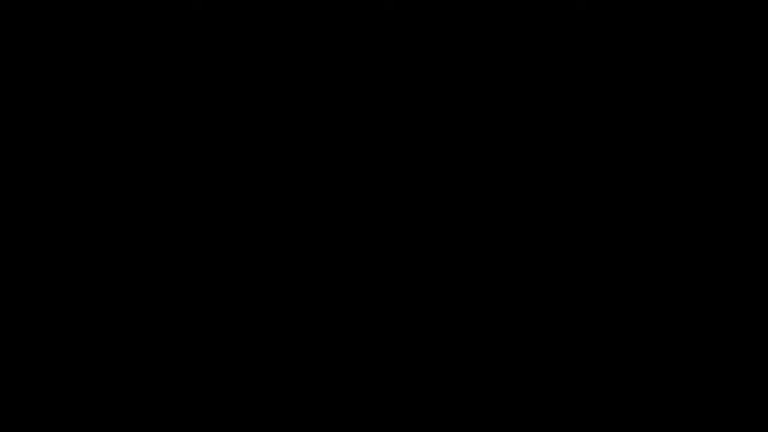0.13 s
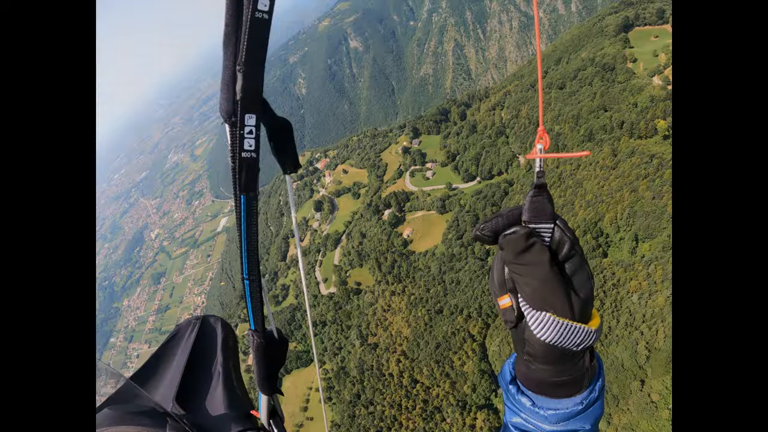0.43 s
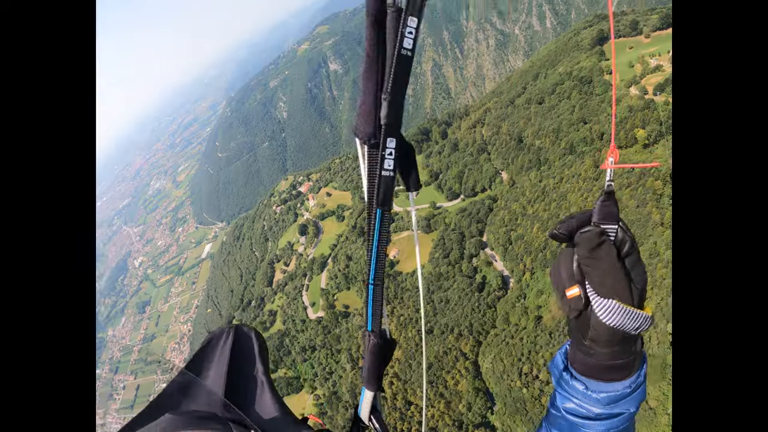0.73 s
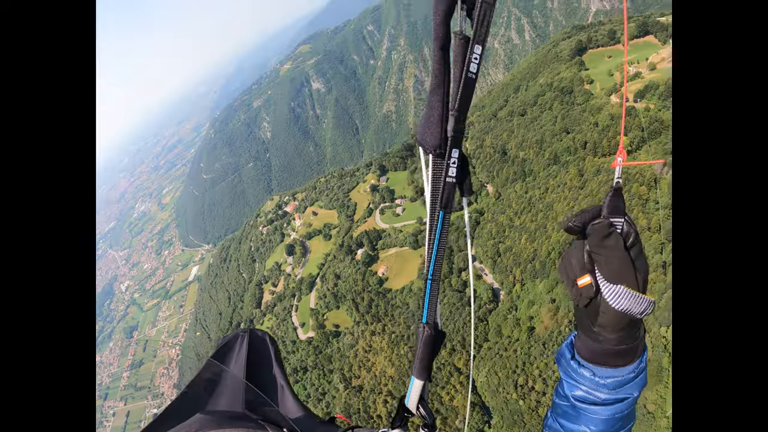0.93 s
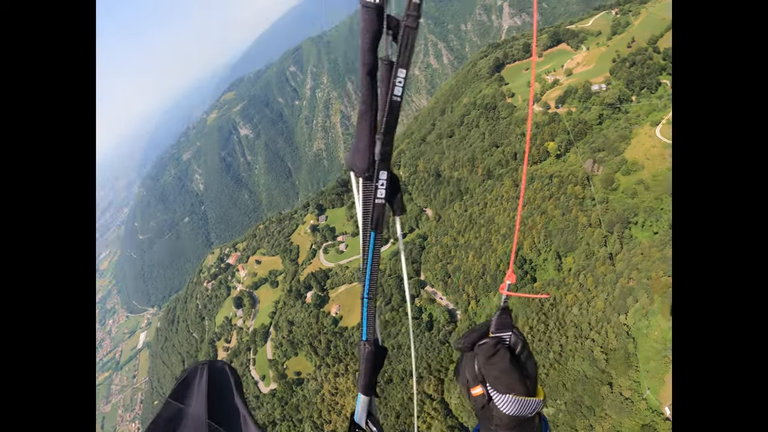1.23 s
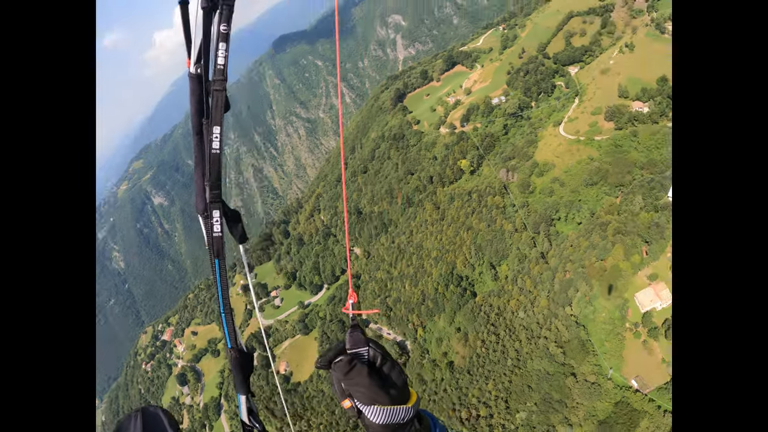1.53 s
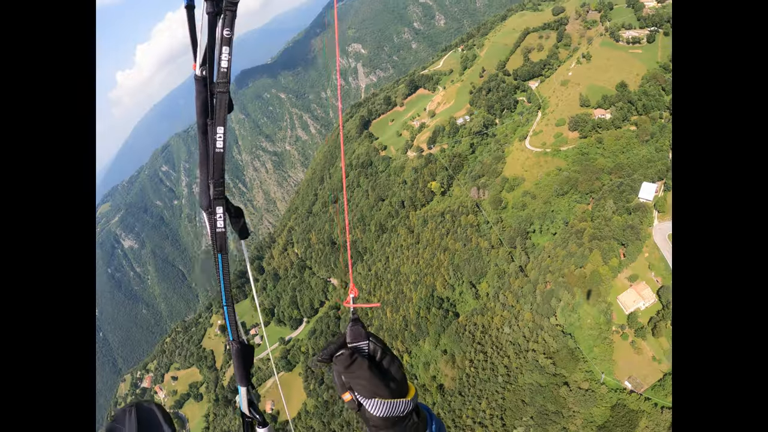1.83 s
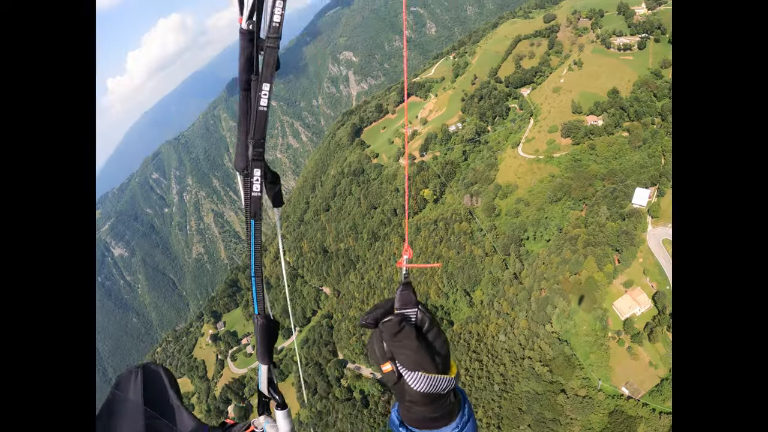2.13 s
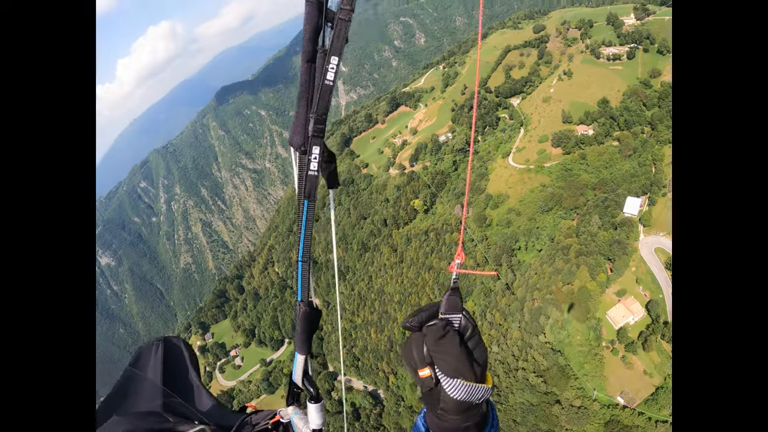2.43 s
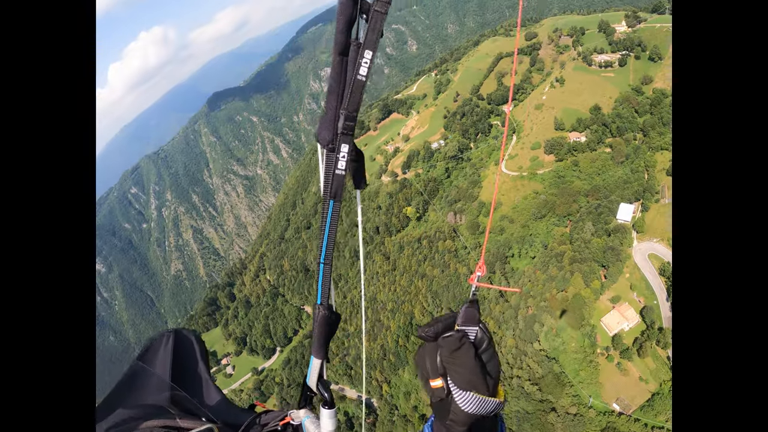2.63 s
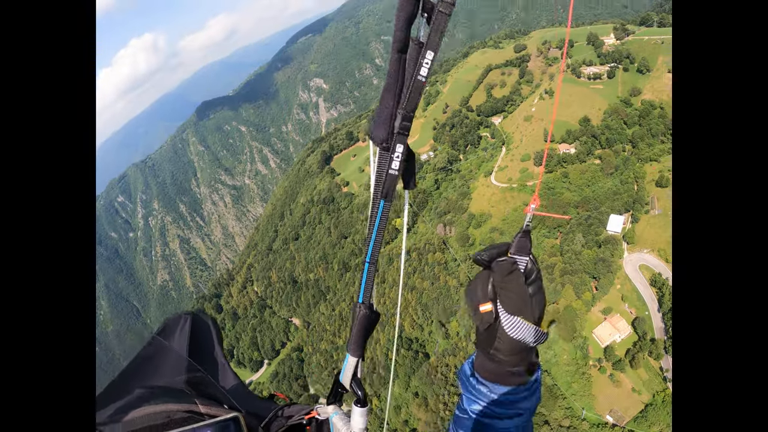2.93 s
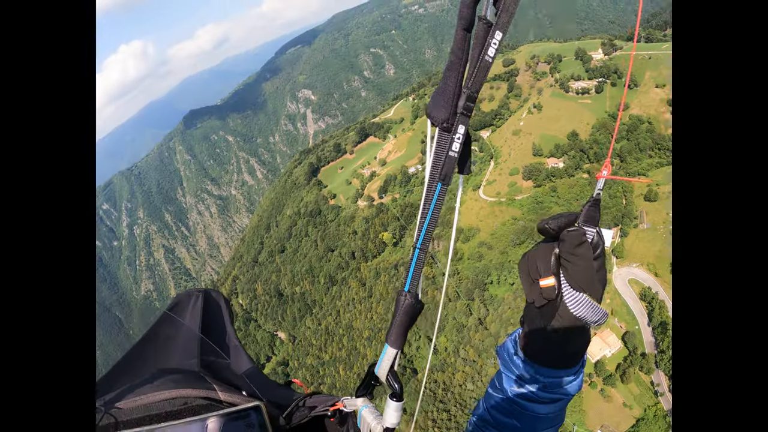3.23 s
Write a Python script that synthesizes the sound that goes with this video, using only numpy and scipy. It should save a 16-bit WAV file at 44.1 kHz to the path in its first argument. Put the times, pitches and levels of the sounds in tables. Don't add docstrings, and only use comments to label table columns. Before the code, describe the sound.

Wind on a paraglider's exposed camera microphone starts abruptly after a tiny silence: deep rumble, soft airy hiss and lumpy turbulence. A pop lands at 0.6 s, a barely audible webbing squeak at 0.8. From 1.1 to 1.9 s, hard thumps, flutter and fizz crowd together, the level ducking after loud hits. Sparse pops follow over calmer rumble; heavy gusts return at 2.9-3.2 s, then subside.

```python
import sys
import numpy as np
from scipy import signal
from scipy.fft import rfft, irfft, next_fast_len
from scipy.io import wavfile
from scipy.ndimage import uniform_filter1d, map_coordinates

SR = 44100
rng = np.random.default_rng(int(sys.argv[2]) if len(sys.argv) > 2 else 0)


def store_pcm(level_fs):
    pcm = np.round(np.clip(level_fs, -1, 1) * 32767).astype(np.int16)
    wavfile.write(sys.argv[1], SR, np.atleast_2d(pcm).T)


def volts(x):
    e = np.asarray(x, float) / 20
    return 10 ** e


N = 148617


def unit(x):
    return x / np.sqrt(np.mean(x ** 2) + 1e-20)


def curves(rows):
    s, *cols = np.transpose(rows)
    return [np.interp(np.arange(N) / SR, s, c) for c in cols]


def wobble(rate_hz):
    knots = rng.standard_normal(int(N * 400 / SR) + 4)
    return map_coordinates(knots, [np.arange(N) * min(rate_hz, 400) / SR])


def rush(spectrum, patchy_db, source=1):
    z = signal.stft(source * rng.standard_normal(N), nperseg=512)[2]
    field = uniform_filter1d(rng.standard_normal(z.shape), size=8, axis=0)
    field = uniform_filter1d(field, size=8, axis=1)
    x = signal.istft(z * volts(patchy_db * unit(field)), nperseg=512)[1][:N]
    m = next_fast_len(N + 8192)
    hz, db = np.transpose(spectrum)
    log_hz = np.log(np.fft.rfftfreq(m, 1 / SR) + 1)
    colour = volts(np.interp(log_hz, np.log(hz + 1), db, right=-180))
    return unit(irfft(rfft(x, m) * colour, m)[:N])


def steady(x, window_s):
    power = np.abs(uniform_filter1d(x ** 2, round(window_s * SR)))
    return unit(x / np.sqrt(power + 0.2))


def bursts(rows, rise_s, fall_s):
    t = np.arange(N) / SR
    total = 0
    for s, length_s, db in rows:
        ramp = np.minimum((t - s) / rise_s, (s + length_s - t) / fall_s)
        total = total + volts(db) * np.clip(ramp, 0, 1)
    return total


def airflow():
    # [t/s, hiss level/dB, rumble level/dB]
    flow = [(0, -56, -19), (.17, -54, -18), (.3, -53.5, -15), (.4, -51.5, -20), (1.1, -49.5, -17.5),
            (1.28, -55, -19), (1.45, -54, -21), (1.75, -58.5, -15.5), (1.9, -56.5, -19.5),
            (2.1, -60.5, -20), (2.5, -57, -20.5), (2.7, -53.5, -20), (2.97, -52.5, -19), (3.15, -59, -15),
            (3.18, -58.5, -24), (3.21, -60, -30.5), (3.23, -57.5, -13.5), (3.37, -60, -20.5)]
    # [f/Hz, density/dB per Hz]
    rumble_spectrum = [(10, -10.5), (30, 0), (48, 1), (65, 2), (125, -5), (170, -14.5), (400, -34.5),
                       (1600, -100)]
    # [f/Hz, density/dB per Hz]
    hiss_spectrum = [(800, -21.5), (2000, -5.5), (4000, -4.5), (6000, -6), (7500, -13.5), (9000, -27),
                     (11500, -40.5), (15500, -88.5)]
    hiss_db, rumble_db = curves(flow)
    rumble_db = rumble_db + (0.98 - 1.5) * duck_db() + 0.5 * wobble(12)
    rumble = volts(rumble_db) * steady(rush(rumble_spectrum, patchy_db=1.0), 0.22)
    hiss_db = hiss_db + 2 + 0.56 * wobble(3.6) + 0.71 * wobble(24.69)
    hiss = volts(hiss_db) * rush(hiss_spectrum, patchy_db=1.2)
    return rumble + hiss


def buffets():
    # [t/s, swirl level/dB, stream level/dB]
    strength = [(0, -34, -42.5), (.3, -30.5, -41.5), (.6, -30, -40.5), (.8, -31.5, -38.5), (1, -30.5, -35),
                (1.15, -23.5, -38.5), (1.31, -25, -37), (1.32, -32, -46.5), (1.45, -34.5, -48),
                (1.6, -28, -44.5), (1.85, -35.5, -45.5), (1.97, -32.5, -49), (2.1, -34.5, -50.5),
                (2.5, -36, -47.5), (2.9, -33.5, -42), (3.1, -35, -45.5), (3.19, -34.5, -46),
                (3.37, -39, -46.5)]
    # [start/s, length/s, level/dB]
    jets = [
        (1.545, 0.077, -42.5),
        (1.72, 0.076, -52),
        (1.76, 0.08, -42),
        (3.05, 0.03, -39),
        (3.115, 0.026, -31.5),
    ]
    # [start/s, length/s, level/dB, flutter strength/1]
    gusts = [(1.169, 0.047, -28.5, 0.29), (1.231, 0.056, -25, 1.34), (1.279, 0.042, -21, 0.74),
             (1.328, 0.067, -27.5, 0.13), (1.496, 0.024, -13.5, 0.13), (1.551, 0.024, -14.5, 0.2),
             (1.575, 0.029, -20.5, 0.37), (1.714, 0.033, -15.5, 0.54), (1.741, 0.048, -19.5, 0.96),
             (1.824, .018, -14.5, 0.8), (1.844, 0.049, -26, 0.21), (1.983, 0.024, -26.5, 0.11),
             (2.239, 0.024, -21.5, 0.15), (2.921, 0.038, -25.5, .1), (2.976, 0.035, -22.5, 0.055),
             (3.004, 0.04, -16, 0.08), (3.05, 0.019, -15.5, 0.42), (3.079, 0.035, -19, 0.29),
             (3.108, 0.032, -15, 0.3), (3.153, 0.017, -14.5, 0.2)]
    # [f/Hz, density/dB per Hz]
    swirl_spectrum = [(60, -25), (150, -3), (300, -4.5), (430, -7.5), (620, -9), (800, -17.5),
                      (2000, -42.5), (10000, -100)]
    # [f/Hz, density/dB per Hz]
    stream_spectrum = [(400, -22.5), (800, -3), (1100, 1), (1500, -4), (2200, -10), (3500, -15),
                       (5500, -33), (10000, -73)]
    # [f/Hz, density/dB per Hz]
    thump_spectrum = [(50, -21.5), (120, 1), (220, -8), (400, -14.5), (700, -25), (1500, -56.5),
                      (4000, -79.5)]
    # [f/Hz, density/dB per Hz]
    flutter_spectrum = [(150, -19.5), (400, 6), (700, 2), (1200, -8.5), (2000, -18.5), (4000, -40),
                        (8000, -89.5)]

    swirl_db, stream_db = curves(strength)
    swirl_level = volts(swirl_db + 0.18 * wobble(22))
    swirl = rush(swirl_spectrum, patchy_db=1.5, source=volts(0.4 * wobble(90)))
    bed = swirl_level * steady(swirl, 0.14)

    stream_level = volts(stream_db + 0.89 * wobble(5.4)) + bursts(jets, 0.0048, 0.023)
    stream = stream_level * rush(stream_spectrum, patchy_db=1.5)

    thump_level = bursts([row[:3] for row in gusts], 0.0064, 0.005)
    thump = thump_level * steady(rush(thump_spectrum, patchy_db=1.0), 0.018)

    flutter_rows = [(s, length_s, db - 5 + 20 * np.log10(max(share, 0.01)))
                    for s, length_s, db, share in gusts]
    flutter_level = bursts(flutter_rows, 0.0055, 0.0093)
    flutter = rush(flutter_spectrum, patchy_db=3.0, source=volts(1.8 * wobble(160)))
    flutter = flutter_level * steady(flutter, 0.033)
    return (bed + stream) * volts(-0.6 * duck_db()) + (thump + flutter) * volts(-0.95 * duck_db())


def pops():
    # [t/s, peak level/dB, pitch f/Hz]
    eddies = [(0.614, -21.5, 700), (1.098, -18, 550), (1.229, -22, 595), (1.246, -14.5, 650),
              (1.28, -14, 600), (1.3075, -9.5, 696), (1.396, -26, 500), (1.5068, -21, 596),
              (1.555, -16, 500), (1.586, -12, 480), (1.688, -26.5, 600), (1.705, -13, 740),
              (1.731, -24, 700), (1.741, -25, 796), (1.759, -13, 650), (1.768, -18.5, 694),
              (1.828, -17.5, 600), (1.855, -25, 900), (2.153, -14.5, 580), (2.242, -23, 500),
              (2.307, -19.5, 1050), (2.746, -15.5, 510), (2.898, -13, 880), (2.944, -30, 800),
              (3.022, -19.5, 540), (3.057, -12.5, 890), (3.102, -10, 597), (3.124, -12, 695),
              (3.1604, -18, 720)]
    out = np.zeros(N + SR)
    t = np.arange(-SR // 100, SR // 100) / SR
    shapes = rng.uniform(-0.71, 1, (len(eddies), 2))
    for (s, db, hz), (sign, lean) in zip(eddies, shapes):
        cycles = t * hz
        swing = np.cos(2 * np.pi * cycles * 0.46 + 0.5 * lean) + 0.68 * np.tanh(cycles / 0.083)
        decay_cycles = np.where(cycles < 0, 0.6, 0.35)
        spike = swing * np.exp(-np.sqrt(cycles ** 2 + 0.0064) / decay_cycles)
        for size in (4, 4, 3):
            spike = uniform_filter1d(spike, size=size)
        start = round((s + 0.002) * SR) - len(t) // 2
        out[start:][:len(t)] += np.sign(sign) * volts(db + 4.5) * spike * np.hanning(len(t))
    return out[:N]


def squeaks():
    # [start/s, length/s, from f/Hz, to f/Hz, level/dB]
    rubs = [
        (.812, 0.026, 8100, 8800, -74),
        (3.041, 0.06, 8800, 9150, -79.5),
    ]
    out = np.zeros(N)
    for s, length_s, from_hz, to_hz, db in rubs:
        u = np.linspace(0, 1, round(length_s * SR))
        hz = from_hz + (to_hz - from_hz) * np.sin(u * 2.5) + 170 * wobble(150)[:len(u)]
        tone = np.sin(2 * np.pi * np.cumsum(hz) / SR)
        out[round(s * SR):][:len(u)] += volts(db + 15) * np.sin(np.pi * u) ** 0.6 * tone
    return out


def spray():
    # [start/s, length/s, level/dB]
    tears = [
        (.98, .16, -48.5),
        (1.1, 0.13, -46),
        (1.19, 0.076, -43.5),
        (1.245, 0.055, -49),
        (1.31, 0.097, -57),
        (1.555, 0.042, -53.5),
        (1.762, 0.039, -45),
        (1.79, .045, -50.5),
        (3.065, 0.037, -44.5),
        (3.125, 0.093, -54.5),
    ]
    # [f/Hz, density/dB per Hz]
    fizz_spectrum = [(900, -26.5), (1600, -2), (2400, 1.5), (3300, 0), (4400, -5.5), (5500, -19.5),
                     (7000, -47), (9000, -90)]
    fizz = rush(fizz_spectrum, patchy_db=3.0, source=volts(1.5 * wobble(220)))
    grain = steady(fizz, 0.04)
    return bursts(tears, 0.033, 0.021) * grain * volts(-0.8 * duck_db())


def whirls():
    # [centre t/s, pitch f/Hz, level/dB]
    trains = [(1.247, 750, -16.5), (1.509, 950, -25), (1.733, 950, -17.5), (1.744, 1100, -26),
              (1.77, 1000, -22), (1.783, 1050, -21), (1.79, 1100, -30), (1.8, 1700, -34),
              (1.812, 1300, -34), (1.821, 1700, -30), (2.995, 200, -14), (3.027, 197, -18),
              (3.091, 230, -16.5), (3.127, 500, -23)]
    t = np.arange(N) / SR
    total = 0
    for s, hz, db in trains:
        cycles = (t - s) * hz
        swell = np.exp(-(cycles / 1.21) ** 2)
        total = total + volts(db) * swell * np.sin(2 * np.pi * cycles)
    return total


def duck_db():
    # [t/s, depth/dB]
    ducks = [
        (1.303, 13),
        (1.551, 14.5),
        (1.599, 5),
        (1.7, 5),
        (1.74, 7),
        (1.83, 6.5),
        (2.99, 7.5),
        (3.029, 6),
        (3.1, 16),
        (3.15, 7),
    ]
    attack_s, hold_s, release_s = 0.019, 0.035, 0.024
    t = np.arange(N) / SR
    loss_db = 0
    for s, depth_db in ducks:
        age = np.maximum(t - s, 0)
        back = np.exp(-np.maximum(age - hold_s, 0) / release_s)
        loss_db = loss_db + depth_db * (1 - np.exp(-age / attack_s)) * back
    return -loss_db


def scene():
    bed = airflow() + buffets()
    strikes = (squeaks() + pops() + whirls()) * volts(-0.95 * duck_db())
    return (bed + strikes + spray())[None]


def starved(x):
    # [f/Hz, share of bands dropped/1]
    holes = [(8200, 0), (8400, .2), (9400, .1), (10500, 0.12), (11800, .7), (12400, 1), (13400, 0.86)]
    band_hz = 560
    hz, t, z = signal.stft(x, SR, nperseg=1024)
    band = (hz // band_hz).astype(int)
    moment = np.arange(len(t)) // 3
    chance = rng.random((band.max() + 1, moment.max() + 1))[band][:, moment]
    share = np.interp(band_hz * (band + 0.5), *np.transpose(holes), left=0, right=0)
    strong = np.abs(z) > 4.5 * np.median(np.abs(z), axis=-1, keepdims=True)
    kept = (chance > share[:, None]) | strong
    return signal.istft(z * kept, SR, nperseg=1024)[1][:, :N]


def self_noise():
    flickers = [.185, .22, .6, .71, .85, 1.37, 1.585, 1.76, 1.84, 1.93, 2.2, 2.245, 2.315, 2.375, 2.5, 2.54,
                2.745, 2.82, 3.165, 3.225, 3.315]
    # [f/Hz, density/dB per Hz]
    noise_spectrum = [(9000, -30.5), (11500, -1.5), (15300, -5), (15900, -61)]
    length_s, flicker_db = 0.024, 17
    rows = [(s - length_s / 2, length_s, flicker_db) for s in flickers]
    flicker = bursts(rows, 0.006, 0.006)
    return volts(-106) * (0.2 + flicker) * rush(noise_spectrum, patchy_db=-1.5)


def abrupt_start(x):
    start_s, step_db, fade_s = 0.0363, -22, 0.0062
    start = round(start_s * SR)
    age = np.arange(N) / SR - start_s
    offset = volts(step_db) - x[:, start:start + 1]
    return (x + offset * np.exp(-np.abs(age) / fade_s)) * (age >= 0)


def roll_off(x):
    return signal.sosfilt(signal.butter(12, 16600, fs=SR, output="sos"), x)


def record(dry):
    ceiling, knee = 0.91, 4
    x = dry * volts(duck_db())
    x = x / (1 + np.abs(x / ceiling) ** knee) ** (1 / knee)
    x = starved(x) + self_noise()
    return roll_off(abrupt_start(x))


dry = scene()
out = record(dry)
store_pcm(out)
```